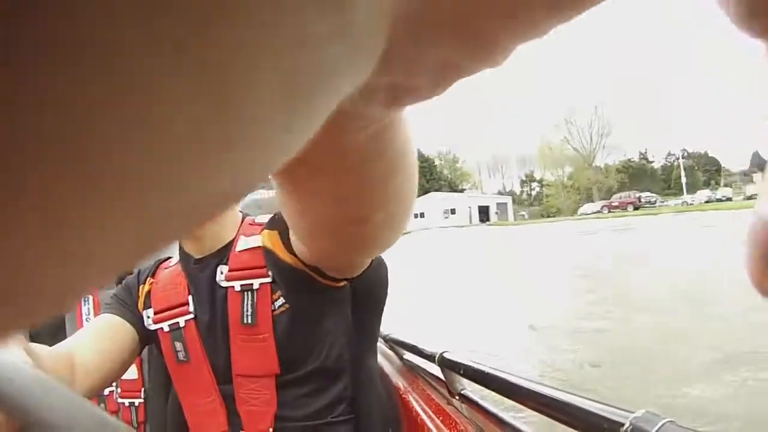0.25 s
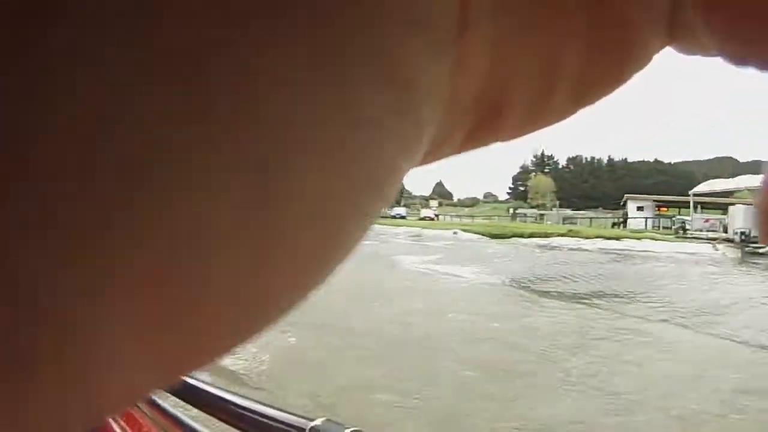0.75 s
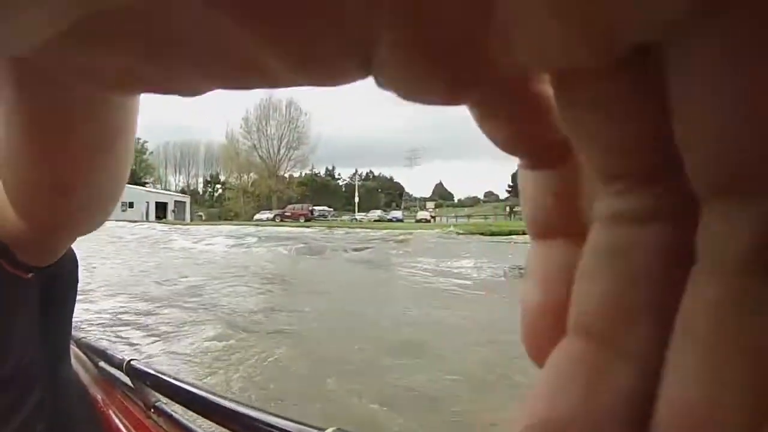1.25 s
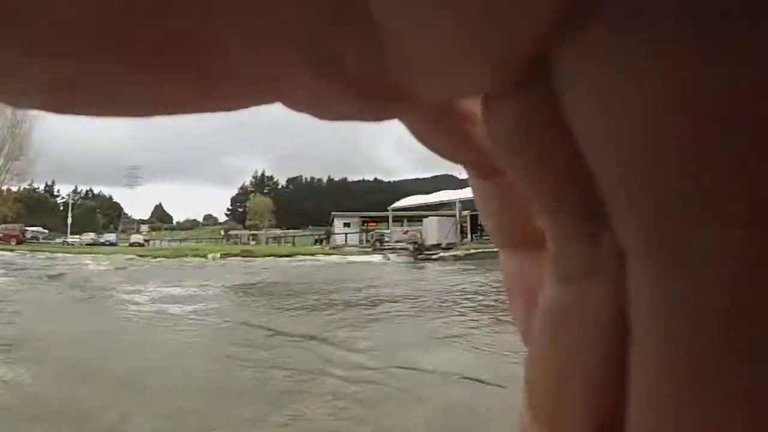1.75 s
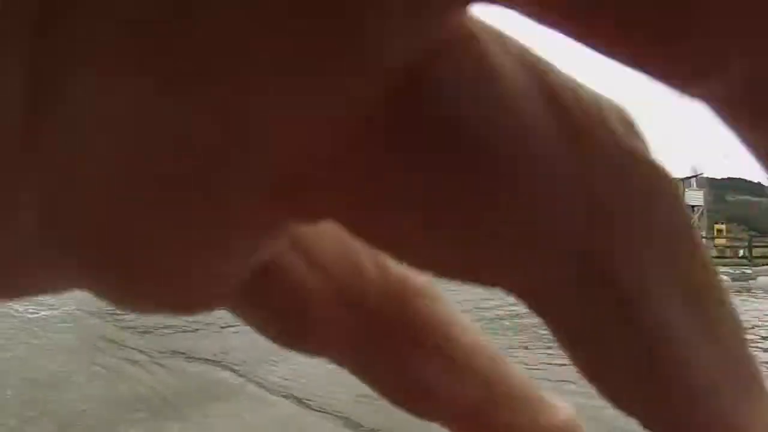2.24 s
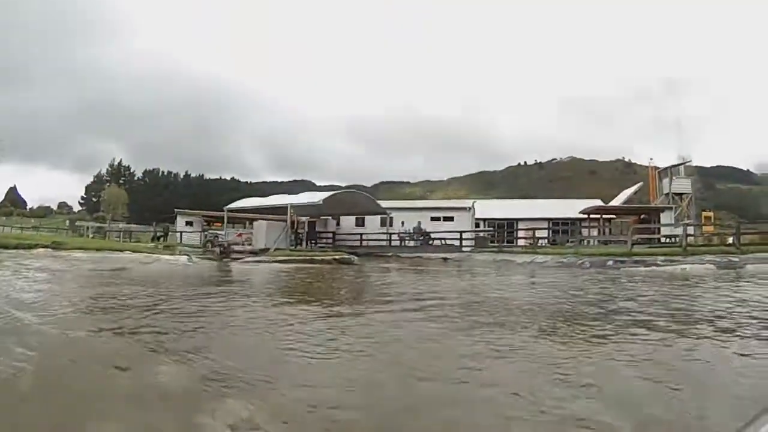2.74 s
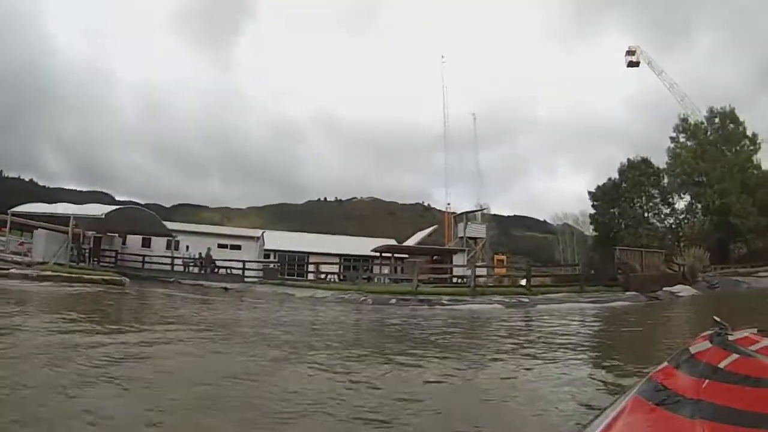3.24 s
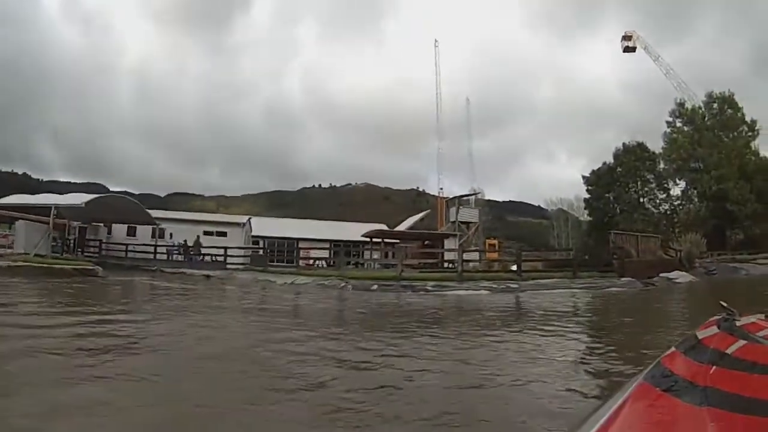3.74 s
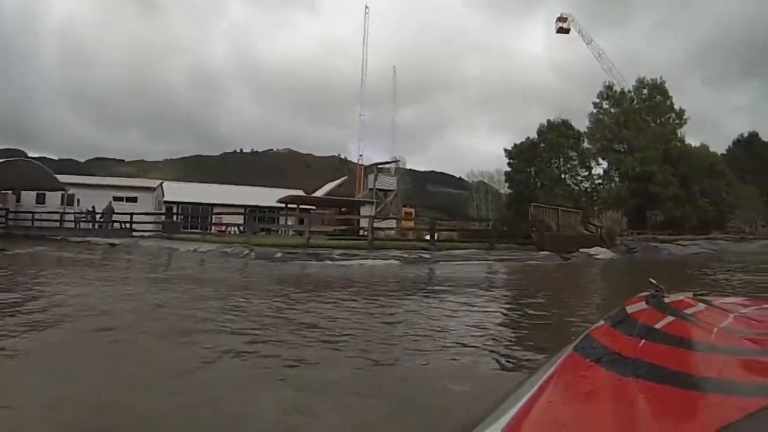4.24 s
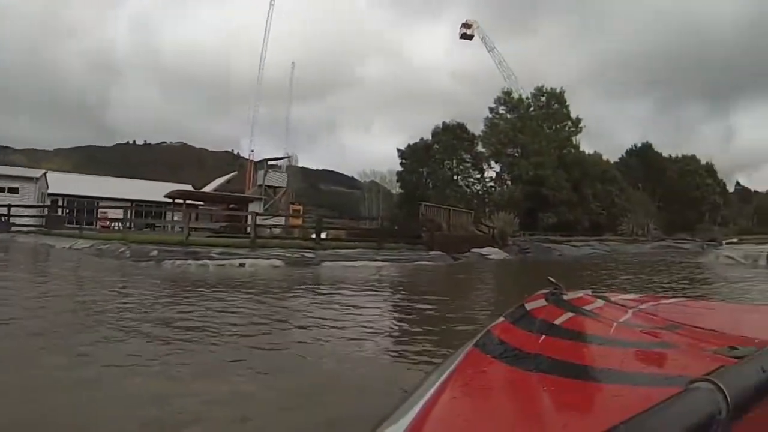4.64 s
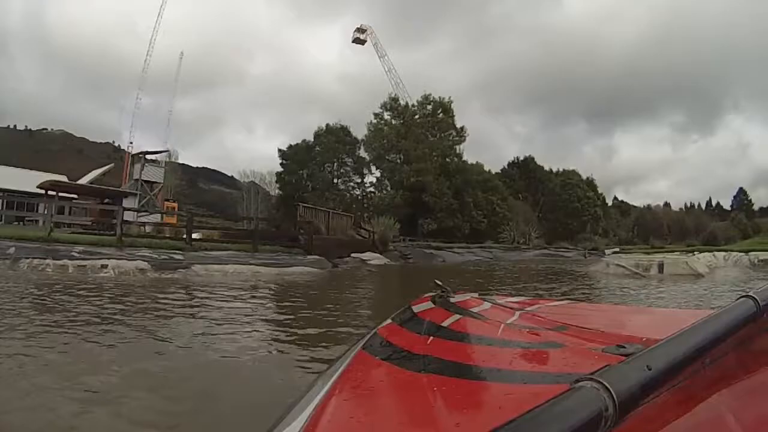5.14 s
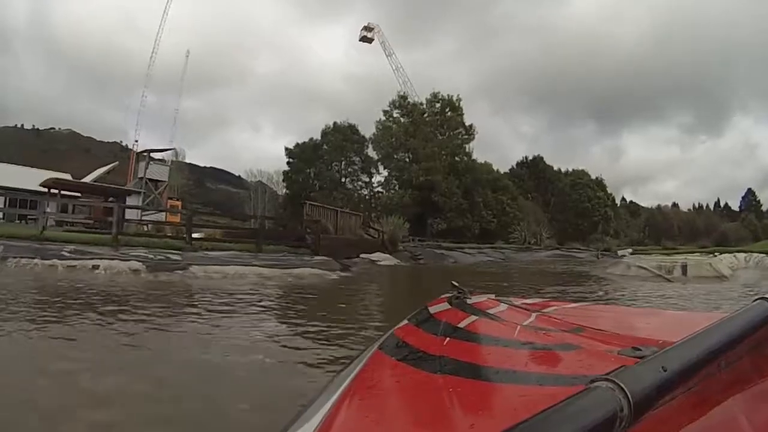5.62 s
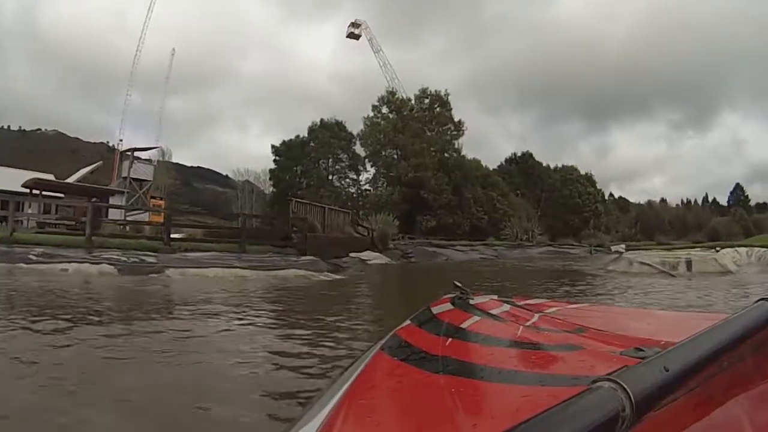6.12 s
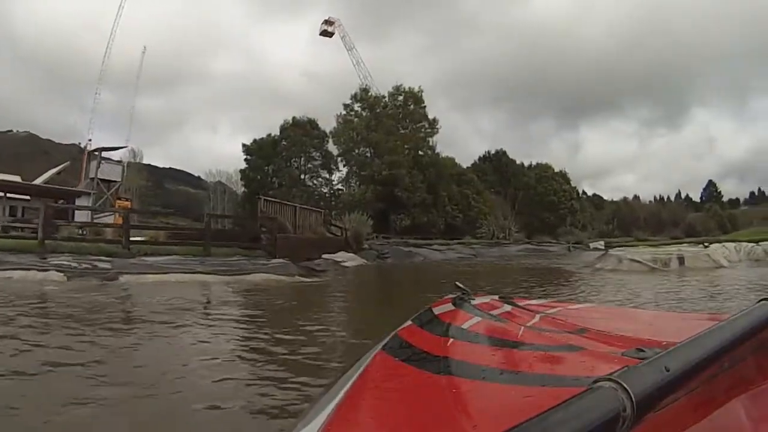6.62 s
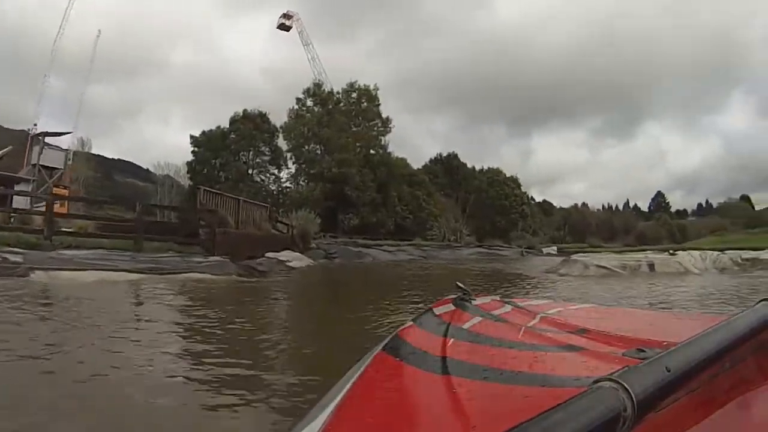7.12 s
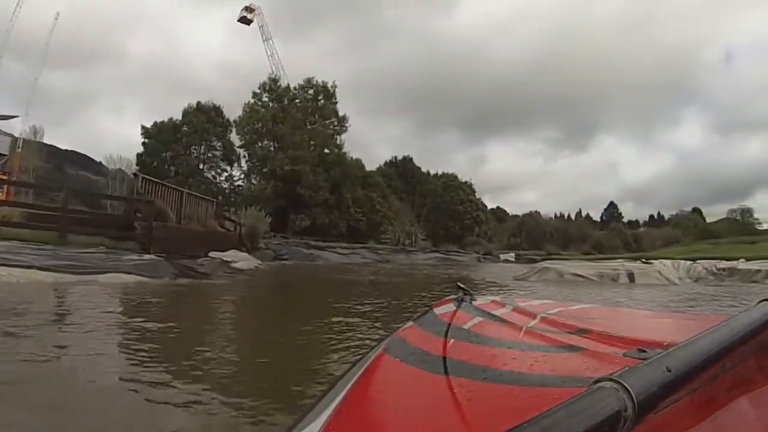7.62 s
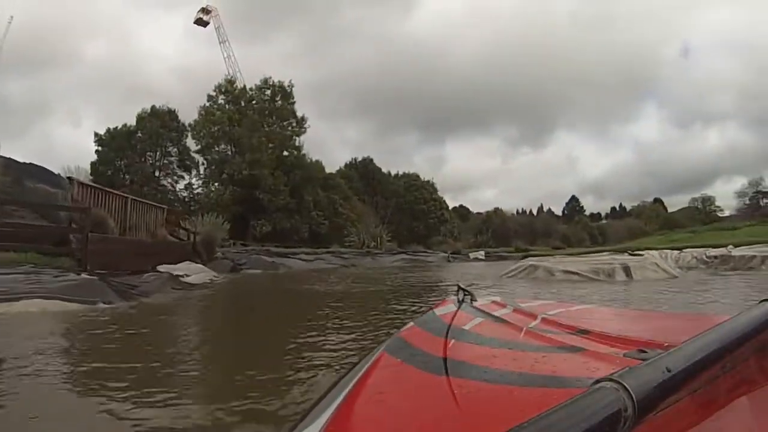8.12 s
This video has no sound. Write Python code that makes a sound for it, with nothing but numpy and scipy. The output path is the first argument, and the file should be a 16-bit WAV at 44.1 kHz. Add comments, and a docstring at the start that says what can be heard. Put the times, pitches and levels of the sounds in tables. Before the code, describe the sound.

Fingers rub and twist a plastic camera case over a low boat engine drone that later climbs in pitch and surges.

```python
"""Boat engine from inside a camera case

A big engine idles, picks up and starts to rev: firing tones, hull growl, whines and hiss, heard from
inside a small camera's sealed plastic case. A hand turns the camera on its mount: fingers rub and thump
the case; the joint sticks and slips in ticks, rattles and creaks. The river washes faintly and spray
hisses up at the last surge."""
import sys
import numpy as np
from scipy import signal
from scipy.io import wavfile
from scipy.ndimage import uniform_filter1d

SR = 44100
rng = np.random.default_rng(int(sys.argv[2]) if len(sys.argv) > 2 else 0)


def transcribe(u):
    """Save the signal u as a 16-bit wav file named by the first command-line argument.

    u: samples, shape (n,) or (channels, n), limited to [-1, 1]; the rate is SR.
    q: integer samples, one column per channel.
    """
    v = np.clip(np.atleast_2d(u).T, -1, 1)
    q = np.round(v * 32767).astype(np.int16)
    wavfile.write(sys.argv[1], SR, q)


N = 369116
SURGE_S = 8.03  # throttle opens for the last surge

# grip on the case: t/s, rocking level/dB, growl gain/dB, resting-finger rub level/dB
GRIP = [(0, -34, -1, -55), (.6, -28.5, -0.5, -62), (1.2, -24, 2.5, -50), (2.2, -39, 2, -55),
        (3.4, -27.5, 5.5, -56.5), (4.8, -51, -1, -60), (5.45, -21.5, -0.5, -67.5)]


def amp(db):
    """Amplitude from dB."""
    return 10 ** (np.asarray(db) / 20)


def unit_rms(x):
    """Scale to an RMS of 1."""
    return x / np.sqrt(np.mean(x ** 2) + 1e-20)


def curves(rows):
    """Table columns interpolated per sample; column 0 is t/s."""
    times_s, *columns = np.transpose(rows)
    return [np.interp(np.arange(N) / SR, times_s, column) for column in columns]


def drift(hz):
    """Unit-RMS noise, low-passed at hz."""
    return unit_rms(signal.sosfilt(signal.butter(2, hz, fs=SR, output="sos"), rng.standard_normal(N)))


def pulses(rate_hz):
    """Sample indices at which a rate curve completes a cycle."""
    cycles = np.floor(np.cumsum(rate_hz) / SR)
    return np.flatnonzero(np.diff(cycles)) + 1


def held():
    """1 while the hand grips the case, 0 once it has let go."""
    return np.clip((5.72 - np.arange(N) / SR) / 0.226, 0, 1)


def surge(rise_s):
    """0 before the last surge, then a ramp to 1."""
    return np.clip((np.arange(N) / SR - SURGE_S) / rise_s, 0, 1)


def colour(x, db_of_hz, size=16384):
    """Minimum-phase filter of the given shape, scaled to unit energy."""
    hz = abs(np.fft.fftfreq(size, 1 / SR)) + 1
    log_gain = np.log(amp(np.maximum(db_of_hz(hz), -100)))
    taps = np.fft.ifft(np.exp(np.conj(signal.hilbert(log_gain)))).real
    return signal.oaconvolve(x, taps[:size // 2] / np.linalg.norm(taps))[:len(x)]


def case(x, low_hz, high_hz, widen, db_per_oct=0., steep=2):
    """Ring the plastic case's modes between two band edges."""
    # case modes: f/Hz, base width/Hz, level/dB
    modes = [(623, 173, 11), (865, 157, 6), (1002, 79, 5), (1741, 250, -3), (2536, 310, -8),
             (3075, 555, -8.5), (4440, 150, -17.5), (5430, 76, -19.5), (6740, 450, -23.5)]

    def gain_db(hz):
        power = sum(amp(2 * db) / (1 + abs(2 * (hz - mode_hz) / (widen * width_hz)) ** steep)
                    for mode_hz, width_hz, db in modes)
        edges = (1 + (low_hz / hz) ** 6) * (1 + (hz / high_hz) ** 6)
        return 10 * np.log10(power / edges) + db_per_oct * np.log2(hz / 1000)
    return colour(x, gain_db)


def touch(drive, widen, low_hz, top_db_per_oct):
    """Contact on the case: three drives ring its low, middle and top modes."""
    low = case(drive[0], low_hz, 1200., widen)
    middle = case(drive[1], 1740., 5300., widen)
    top = case(drive[2], 4840., 16000., widen, top_db_per_oct)
    return low + middle + top


def engine(scatter=0.93, slap=0.78, cruise_hz=108):
    """The mean firing gives two wavering tones; each blow's deviation from it makes the hull growl."""
    # engine speed: t/s, firing rate/Hz
    speed = [(0, 45.6), (5.7, 45.6), (6.05, 53.4), (6.22, 62), (6.5, 97), (6.68, 105.5), (6.85, 109.5),
             (7.97, 108), (8.08, 116), (8.2, 126), (8.28, 178), (8.37, 213)]
    # firing tones: t/s, fundamental level/dB, octave level/dB
    tone_levels = [(0.25, -25, -25.5), (0.55, -42, -39), (1.2, -37.5, -23.5), (2.2, -17.5, -35.5),
                   (2.7, -35.5, -37.5), (4.7, -29.5, -48), (5.6, -34.5, -32.5), (6.05, -30.5, -22.5),
                   (6.4, -26.5, -32), (6.7, -16.5, -22.5), (6.93, -31, -24), (7.2, -28, -25.5),
                   (7.62, -24.5, -20), (7.85, -21.5, -36.5), (8.18, -23, -19.5), (8.26, -17, -27),
                   (8.37, -18, -25)]
    # geared whines: multiple of the firing rate, level re growl/dB
    whines = [(6.86, -33), (8, -30.5), (9.35, -30), (17.3, -35.5)]
    # hull response at the case: f/Hz, level/dB
    hull = [(85, -13), (105, -2), (150, -3), (190, -5.5), (240, -4.5), (308, -23.5), (345, -10.5),
            (400, -13), (430, -19.5), (540, -35.5), (900, -73)]
    speed_hz = curves(speed)[0]
    speed_oct = np.log2(speed_hz / cruise_hz)
    pickup = np.clip(np.gradient(speed_oct) * SR, 0, 1)
    rate_hz = speed_hz * (1 + (.005 + .025 * held()) * drift(6.) + .045 * pickup * drift(30.))
    phase = 2 * np.pi * np.cumsum(rate_hz) / SR

    tone_db, octave_db = curves(tone_levels)
    growl_db = -21 + 8 * speed_oct + curves(GRIP)[1] * held() + 2.5 * surge(0.035)
    waver_db = 1.85 + 2 * np.clip(2 - rate_hz / 46, 0, 1)  # lumpier at idle
    tones = amp(tone_db + waver_db * drift(21.)) * np.sin(phase)
    tones += amp(octave_db + waver_db * drift(7.3)) * np.sin(2 * phase)
    whine_gate = 1 - held() - surge(0.14)  # stifled by the grip, faded out in the surge
    for multiple, db in whines:
        tones += whine_gate * amp(growl_db + db + 3.1 * drift(7.9)) * np.sin(multiple * phase)

    firings = pulses(rate_hz)
    blows = slap * rng.standard_normal(N) * np.sqrt(rate_hz / SR)  # water slapping the hull
    blows[firings] += scatter * rng.uniform(-0.99, 1, len(firings))
    blows *= np.sqrt(SR / rate_hz)
    hull_hz, hull_db = np.transpose(hull)
    mounted = colour(blows, lambda hz: np.interp(np.log(hz), np.log(hull_hz), hull_db))

    def gripped_db(hz):  # the grip smears the resonances
        return -10 * np.log10((1 + (23.7 / hz) ** 4) * (1 + (hz / 68) ** 2) * (1 + (hz / 298) ** 8))
    gripped = colour(blows, gripped_db)
    growl = (1 - 0.78 * held()) * mounted + held() * amp(3.8 * drift(5.)) * gripped

    hiss = rng.standard_normal(N) * amp(-36.5 + 8 * speed_oct + 0.73 * drift(8.7))  # valve gear, water
    hiss = case(hiss, 230., 6500., widen=0.66, db_per_oct=-0.5, steep=2.15)
    return np.sqrt(2) * tones + amp(growl_db) * growl + hiss + buzz(firings)


def buzz(firings, level_db=-48.):
    """Each firing knocks the case and rings its lowest mode."""
    knocks = np.zeros(N)
    knocks[firings] = rng.uniform(-1, 1, len(firings))
    mode = signal.butter(2, (622., 668.), "bandpass", fs=SR, output="sos")
    return amp(level_db) * unit_rms(signal.sosfilt(mode, knocks))


def hand():
    """Slow rocking under the grip; dull finger thumps that sag in pitch."""
    # finger thumps: t/s, relative level/dB, nominal f/Hz
    thumps = [(0.723, -20, 172), (0.959, -13.5, 104), (1.233, -14, 92.5), (2.6916, -15.5, 106),
              (3.107, -15, 91), (5.298, -25, 37.6), (5.434, -23, 30.5)]
    band = signal.butter(2, (6., 34.), "bandpass", fs=SR, output="sos")
    rocking = unit_rms(signal.sosfilt(band, rng.standard_normal(N)))
    out = amp(curves(GRIP)[0] + 2.8 * drift(0.79)) * rocking * held()
    for start_s, db, hz in thumps:
        cycles = np.arange(8000) / SR * hz
        thump = np.sin(2 * np.pi * cycles ** 0.89) * np.exp(-cycles / 1.14)
        out[round(start_s * SR):][:8000] += amp(db + 9.5) * thump
    return out


def water(wash_db=-63.5, spray_db=-50, spray_db_per_s=23):
    """Steady river wash and spray thrown up by the surge ring the upper case modes."""
    since_s = np.arange(N) / SR - SURGE_S
    spray = surge(0.011) * amp(spray_db + spray_db_per_s * since_s + 2 * drift(60.))
    hiss = (spray + amp(wash_db)) * rng.standard_normal(N)
    return case(hiss, 2200., 10600., widen=0.71, db_per_oct=-0.5)


def rub(patchy_db=3.):
    """Skin sliding on plastic: dense grit that swells with each stroke."""
    # finger strokes: t/s, length/s, level/dB, low-mode share/dB, top-mode share/dB
    strokes = [(0.057, 0.16, -37.5, -7.5, -13.5), (0.211, 0.092, -38, -24, -24),
               (0.787, 0.058, -42.5, -10, -17.5), (0.897, 0.067, -37.5, 0.5, -13.5),
               (1.076, 0.052, -41, 2, -6.5), (1.135, 0.073, -39.5, -26, -21), (1.165, 0.36, -49, 5, -23),
               (1.624, 0.28, -41.5, -35, -22.5), (2.222, 0.12, -36.5, -11, -12.5),
               (2.413, 0.013, -51, -18, -1.5), (2.611, 0.11, -40.5, 5.5, -13),
               (2.712, 0.095, -53, -14, -8.5), (3.337, 0.17, -33, 2, -12), (3.499, 0.088, -34.5, -14, -11),
               (3.822, 0.26, -50, -1.5, -22.5), (5.285, 0.041, -52.5, -20, -19),
               (5.423, 0.04, -40, -6, -12.5), (5.462, 0.067, -44, -10, -13.5),
               (5.574, 0.013, -41, -2, -14.5)]
    resting_db = curves(GRIP)[2] + 2.5 * drift(2.5)
    force = amp([[-6.], [0.5], [-5.]]) * held() * amp(resting_db)
    for start_s, length_s, db, low_db, top_db in strokes:
        stroke = signal.windows.tukey(round((length_s + .015) * SR), .75)
        gains = amp([[db + low_db], [db], [db + top_db + 10.5]])
        force[:, round((start_s - .015) * SR):][:, :len(stroke)] += gains * stroke
    grit = rng.standard_normal((3, N)) * amp(drift(390.) + 1.4 * drift(40.))
    squeal = squeak(force[0] * grit[0])
    grit[0] *= amp(4.5 * drift(120.) + 0.5)  # coarser grains for the low modes
    rubbing = touch(force * grit, widen=1., low_hz=690., top_db_per_oct=-5.)
    # the moving finger picks out changing modes
    spectrum = signal.stft(rubbing, nperseg=256)[2]
    patches = uniform_filter1d(rng.standard_normal(spectrum.shape), size=3, axis=0)
    patches = unit_rms(uniform_filter1d(patches, size=24, axis=1))
    return signal.istft(spectrum * amp(patchy_db * patches), nperseg=256)[1][:N] + squeal


def squeak(drag, width_hz=60., gain_db=14.5):
    """Dragged skin excites a narrow resonance that bends in pitch."""
    # squeak pitch: t/s, f/Hz
    pitch = [(0.92, 630), (3.37, 760), (3.42, 1040), (3.445, 740)]
    carrier = np.exp(2j * np.pi * np.cumsum(curves(pitch)[0]) / SR)
    pole = np.exp(-np.pi * width_hz / SR)
    lowpass = [1 - pole], [1, -pole]
    envelope = signal.lfilter(*lowpass, signal.lfilter(*lowpass, drag / carrier))
    return amp(gain_db) * 2 * (carrier * envelope).real


def ticks(small_per_s=65., tighten_s=(3.65, 5.15), decay_s=0.0012):
    """Each slip of the joint rings the case with a short crackle; small ones crowd in as it tightens."""
    # single slips: t/s, relative level/dB, low-mode share/dB, top-mode share/dB
    slips = [(0.0432, -17.5, -13, -9.5), (0.3112, -18, 3.5, -45), (0.4042, -5, -9, -33.5),
             (0.7213, -27, 14.5, -48), (0.7302, -21, 0, -34), (0.9087, -11, -31, -21),
             (0.9569, -13, 2, -22), (1.0011, -19.5, 8, -17), (1.803, -4.5, -11, -31),
             (2.1355, -21.5, -13, -18.5), (2.6765, -15, -9, -30), (3.107, -17, 3, -39),
             (3.218, -23.5, -15, -33), (3.2912, -14, -28, -28), (3.3205, -20, -10, -10.5),
             (3.3683, -8.5, -14, -20), (3.6575, -15, -1, -22), (4.029, -14.5, -27, -40.5),
             (4.132, -15, 1, -20), (4.1625, -18.5, 9.5, -22), (4.171, -20, -5, -27), (4.2148, -16, 3, -14),
             (4.2294, -16, -16, -14), (4.2519, -7.5, 13.5, -46.5), (4.357, -10, 4, -33),
             (4.4251, -19, 0, -15), (4.4692, -20.5, 3.5, -23), (4.517, -24.5, 2, -34),
             (4.6018, -25.5, -8, -43), (4.6477, -27.5, 5, -14), (4.7141, -24.5, -8, -22),
             (4.7975, -20, 5, -24), (4.8984, -19.5, 2, -10.5), (4.9874, -21, -33, -14.5),
             (5.458, -13, -20, -18), (5.4789, -3.5, -12, -19.5), (5.504, -23, 7, -35),
             (5.5648, -12.5, 7.5, -12)]
    gap, loud, low, top = rng.random((300, 4)).T
    small_s = tighten_s[0] + np.cumsum(-np.log(gap)) / small_per_s
    small = np.transpose([small_s, -45.5 + 12 * loud, -14 * low, -20 - 15 * top])
    rows = np.vstack([slips, rattles(), small[small_s < tighten_s[1]]])
    drive = np.zeros((3, N))
    age = np.arange(256) / SR / decay_s
    for (start_s, db, low_db, top_db), grit in zip(rows, rng.standard_normal((len(rows), 3, 256))):
        pole = np.clip(-top_db / 54, 0, .9)  # dull slips are smoother
        grit[1] = unit_rms(signal.lfilter([1], [1, -2 * pole, pole ** 2], grit[1]))
        grit[0, 12:] = 0  # one plain push for the low modes
        grit[0] = abs(grit[0])
        crackle = grit * np.minimum(age / 0.27, 1) * np.exp(-age)
        crackle /= np.linalg.norm(crackle, axis=1, keepdims=True)
        gains = amp(7.5) * amp([[db + low_db - 7], [db], [db + top_db + 12]])
        drive[:, round(start_s * SR):][:, :256] += gains * crackle
    clicks = touch(drive, widen=1.57, low_hz=307., top_db_per_oct=-6.)
    # square law: hard slips set a stiff part ringing
    ring = amp(22.5) * signal.lfilter(*signal.iirpeak(2690., Q=25., fs=SR), drive[1] * abs(drive[1]))
    tail = amp(-12.) * case(drive[0] + drive[1], 520., 3800., widen=0.19)
    return clicks + ring + tail


def rattles(low_db=1):
    """Rows for ticks(): two short rattles after hard slips; faint scattered ticks as the joint tightens."""
    # slip groups: first relative level/dB, loss per slip/dB, top-mode share/dB, slip times/s
    groups = [(-20.5, 1.5, -44, (.439, .4565, .473, .482, .497)),
              (-15, 1, -50, (1.8236, 1.8373, 1.852, 1.874, 1.896)),
              (-28.5, -1, -28, (4.545, 4.573, 4.635, 4.763, 4.78, 4.805))]
    return [(start_s, db - loss_db * n, low_db, top_db)
            for db, loss_db, top_db, times_s in groups for n, start_s in enumerate(times_s)]


def creak(db_per_oct=5.5):
    """Stick-slip in the joint: each turn speeds up, then slows; faster slips are louder."""
    # turns: start/s, fastest/s, end/s, top slip rate/Hz, half-width of the rate peak/s, level/dB
    turns = [(2.87, 2.991, 3.105, 445, .04, -26.5), (3.135, 3.156, 3.225, 380, .012, -28.5)]
    t = np.arange(N) / SR
    rate_hz, level_db = np.zeros((2, N))
    for start_s, fastest_s, end_s, top_hz, half_s, db in turns:
        on = (t > start_s) & (t < end_s)
        pace = 1 / np.hypot(1, (t[on] - fastest_s) / half_s)
        onset_db = -14 * np.exp((start_s - t[on]) / 0.012)
        rate_hz[on] = top_hz * pace
        level_db[on] = db + db_per_oct * np.log2(pace) + onset_db
    at = pulses(rate_hz * (1 + .04 * drift(90.)))
    slips = np.zeros(N)
    slips[at] = amp(level_db[at] + 1.8 * rng.standard_normal(len(at))) * np.sqrt(SR / rate_hz[at])
    return case(slips, 820., 4300., widen=0.65, db_per_oct=0.15)


def scene():
    """Mono sum at the microphone inside the case."""
    return (engine() + rub() + ticks() + creak() + hand() + water())[None]


def record(dry, edge_hz=15600):
    """Soft-clip the hardest peaks, then low-pass."""
    rounded = dry / (1 + abs(dry) ** 6) ** (1 / 6)
    padded = np.pad(rounded, ((0, 0), (255, 255)), "reflect", reflect_type="odd")
    lowpass = signal.firwin(511, edge_hz, window=("kaiser", 9), fs=SR)
    return signal.oaconvolve(padded, lowpass[None], "valid")


dry = scene()
out = record(dry)
transcribe(out)
```